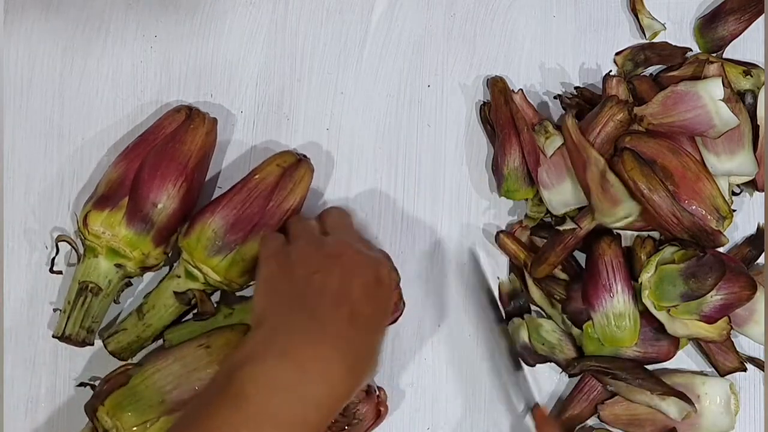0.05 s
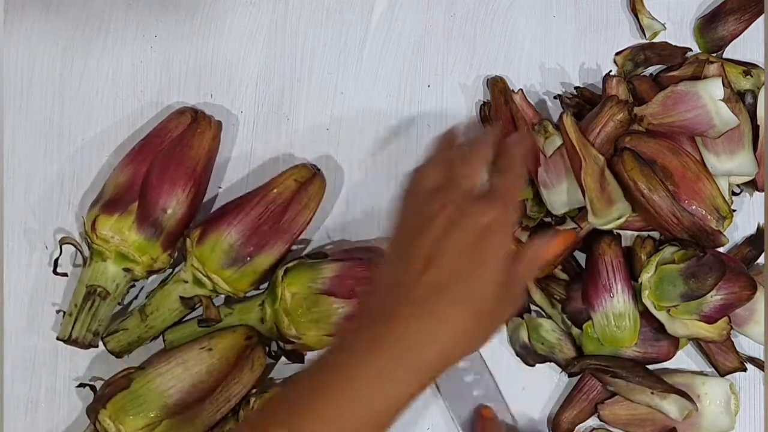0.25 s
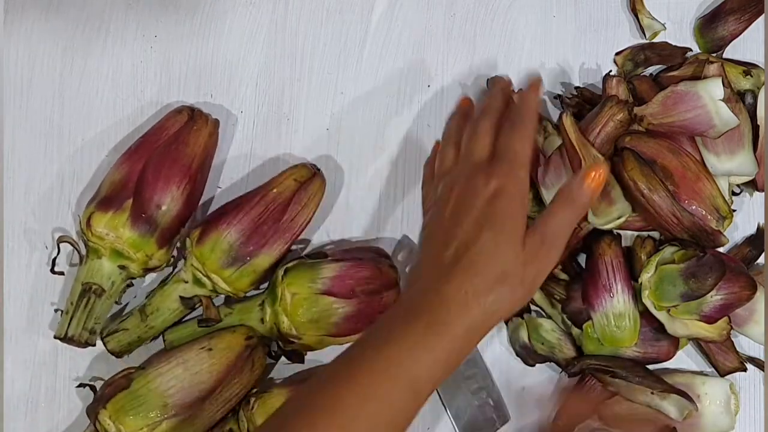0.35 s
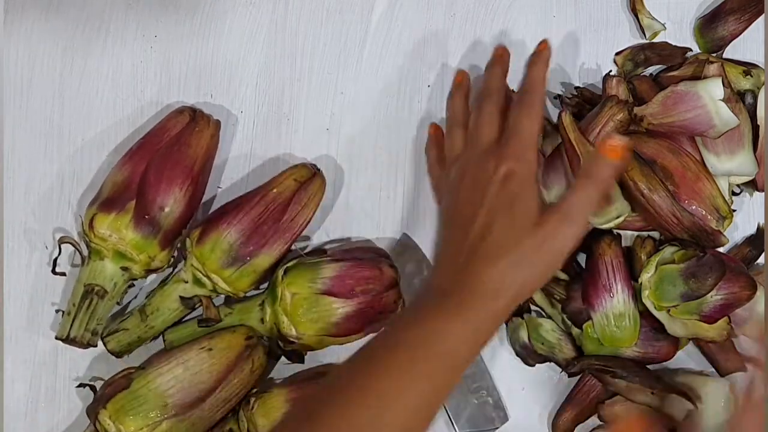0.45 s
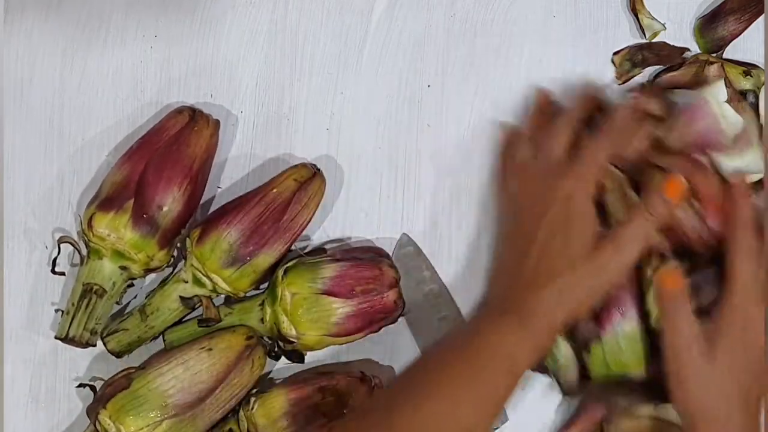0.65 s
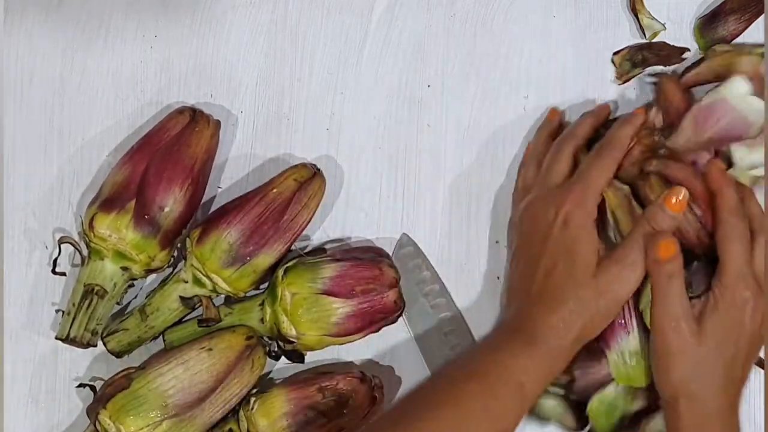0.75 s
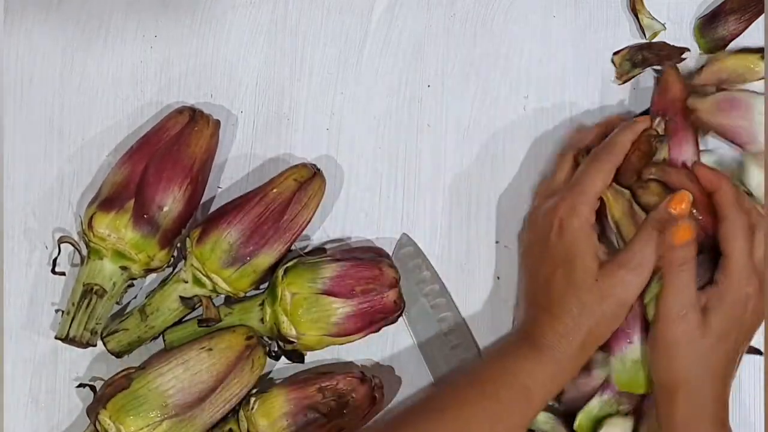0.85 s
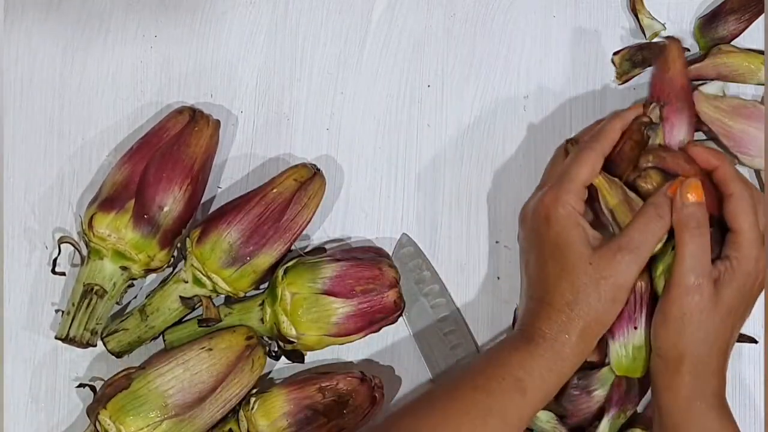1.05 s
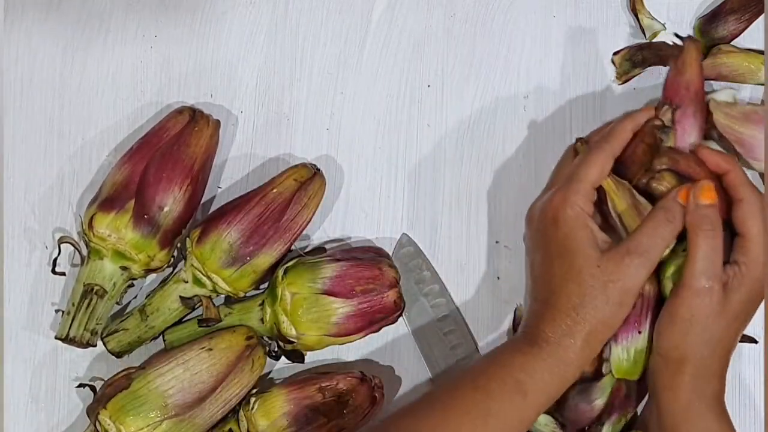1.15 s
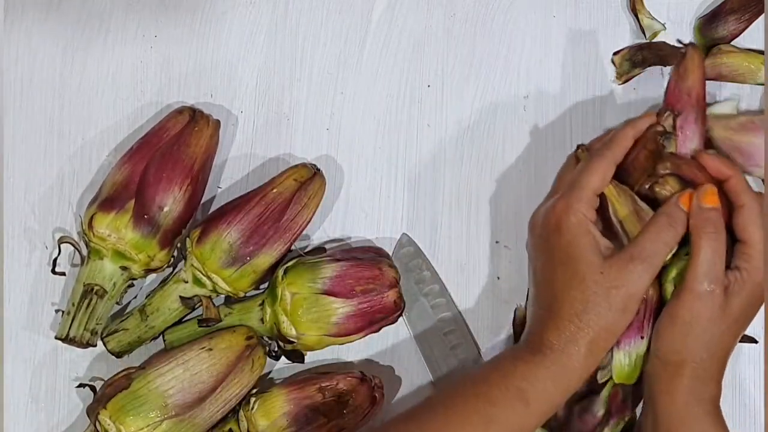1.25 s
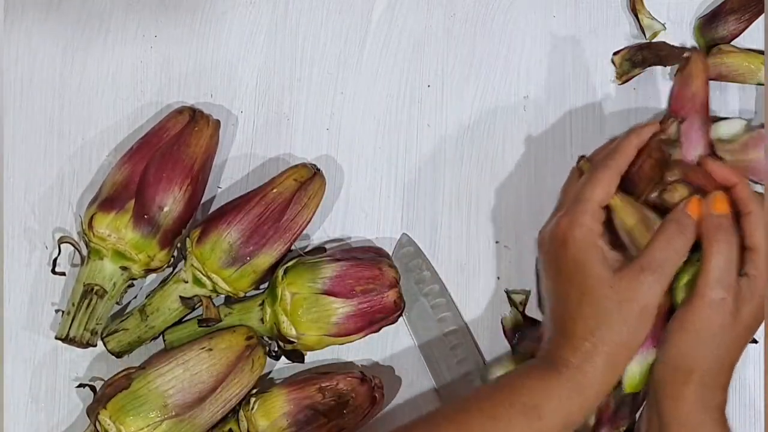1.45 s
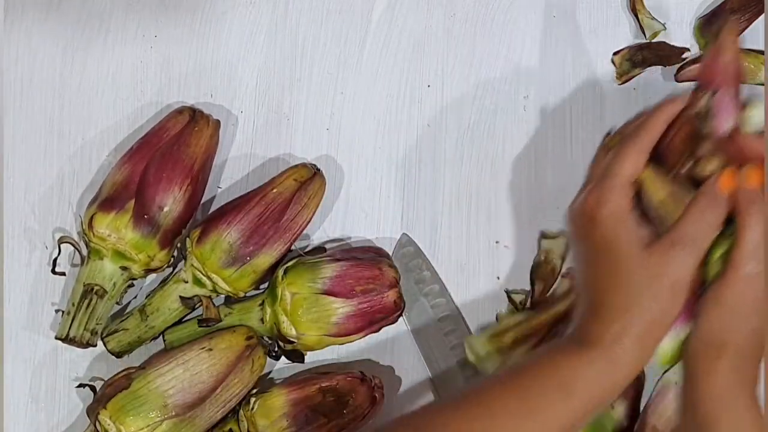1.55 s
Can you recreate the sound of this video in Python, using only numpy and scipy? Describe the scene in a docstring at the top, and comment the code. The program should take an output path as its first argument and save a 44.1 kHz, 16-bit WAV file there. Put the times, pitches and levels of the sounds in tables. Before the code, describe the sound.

A steel knife clatters onto a wooden table, then stiff leaves rustle softly.

```python
"""In a small hard-walled kitchen, an artichoke rolls to rest and a steel knife is put down on a
wooden table. The tip touches and skids, the handle knocks, and the blade clatters flat: each impact
excites the normal modes of steel and wood. Two hands then gather a heap of stiff artichoke leaves,
which rustle, crackle and rub by stick-slip friction and snap as they spring free.
The walls add a short reverberation, and a low rumble lies under it all."""
import sys
import numpy as np
from scipy import signal
from scipy.fft import rfft, irfft
from scipy.io import wavfile
from scipy.ndimage import uniform_filter1d

SR = 44100
rng = np.random.default_rng(int(sys.argv[2]) if len(sys.argv) > 2 else 0)


def generate_wav(sig):
    """Save sig (samples, or channels by samples) to the path in sys.argv[1] as 16-bit PCM at SR."""
    pcm = np.round(np.clip(np.atleast_2d(sig).T, -1, 1) * 32767).astype(np.int16)
    wavfile.write(sys.argv[1], SR, pcm)


N = 70560
T = np.arange(N) / SR

# envelopes of the friction sounds (time [s], level [dB])
ROLL_ENVELOPE = [(0, -43), (.04, -53.5), (.09, -63), (.18, -83)]
RUSTLE_ENVELOPE = [(0, -57), (.12, -91), (.63, -64), (.665, -57.5), (.74, -62.5), (.82, -69.5), (.88, -58),
                   (.95, -71), (1.1, -77.5), (1.24, -81.5), (1.33, -64), (1.4, -77), (1.47, -69.5),
                   (1.53, -64), (1.6, -73.5)]
CRACKLE_ENVELOPE = [(0, -88), (.62, -78.5), (.68, -69), (.74, -66), (.78, -75), (.82, -72), (.9, -73.5),
                    (1.0, -81), (1.15, -83), (1.25, -87), (1.6, -80.5)]
RUB_ENVELOPE = [(.15, -69.5), (.55, -96), (.72, -65.5), (.8, -70), (.9, -67), (1.12, -80), (1.18, -63.5),
                (1.28, -65.5), (1.34, -61), (1.42, -69.5), (1.52, -68.5), (1.6, -69)]
# spectra of the friction sounds (frequency [Hz], relative level [dB])
ROLL_SPECTRUM = [(100, -11.5), (400, -4), (800, -1), (1250, 0), (2000, -5), (3000, -11), (4200, -25.5),
                 (12000, -35.5)]
RUSTLE_SPECTRUM = [(200, -1.5), (700, 1), (1500, 3.5), (3000, 2.5), (5000, -0.5), (8000, -7.5),
                   (12000, -16), (16000, -21)]
CRACKLE_SPECTRUM = [(2000, -31.5), (6000, -4.5), (10000, -2), (13500, -2), (16000, -8.5)]
RUB_SPECTRUM = [(60, -7.5), (220, 2.5), (400, -1.5), (650, 4.5), (950, -2.5), (1400, -14.5), (4000, -29.5)]
# impacts of knife on table (time [s], ring gain [dB], centre of excitation [Hz],
# half-width of excitation [octaves], clack gain [dB], knock gain [dB], thump gain [dB])
IMPACTS = [(0.0, -55, 7900, .08, -67, -44.5, -55.5), (.1995, -45, 5000, 1.3, -29, -31, -48.5),
           (.2212, -38, 5000, 1.3, -30, -30, -51), (.2408, -32, 4640, .5, -28, -32, -59.5),
           (.2675, -39.5, 5870, 0.95, -30, -28.5, -58.5), (.283, -35.5, 9300, .6, -32, -38.5, -60.5),
           (.2925, -29, 7140, 0.49, -29.5, -16.5, -34), (.3162, -20, 6510, 0.48, -24, -20, -38),
           (.3225, -26, 7000, 0.17, -26, -20.5, -48.5), (.3330, -21.5, 6200, 0.53, -28.5, -30, -38.5),
           (.3385, -21.5, 12000, 0.63, -24, -29, -41), (.3425, -19, 8470, 0.25, -32, -30, -38),
           (.349, -26.5, 8910, 0.88, -33, -32.5, -44), (.361, -20, 6100, 0.25, -29.5, -31, -43.5),
           (.3765, -16, 9070, 0.27, -32, -40.5, -41.5), (.399, -36.5, 9100, 0.54, -32, -36.5, -48)]
# blade modes, one list per column (frequency [Hz], relative level [dB], T60 before settling [s])
BLADE_HZ = [3397, 3580, 4115, 4648, 6071, 6095, 6251, 6546, 7213, 7531, 7876, 8624, 8760, 8797, 9474, 10337,
            10658, 11000, 12265, 12480, 12700, 12940, 14180, 14447, 15100]
BLADE_DB = [-7, -16, -7.5, -10, -4.5, -1, -4, -10, -8, -2.5, -6.5, -11.5, -7, -6, -2.5, -6, -5.5, -8, -0.5,
            -7, -5.5, -3, -5.5, -2, -5]
BLADE_T60_S = [.15, .08, .09, .19, .16, 0.11, 0.19, .12, 0.13, .2, .21, 0.1, 0.16, 0.15, .12, .17, 0.25,
               0.11, .15, 0.12, 0.066, 0.12, .11, .15, .11]
# modes of the table top (frequency [Hz], relative level [dB], T60 [s])
TABLE_MODES = [(482, -19.5, .06), (689, -7, 0.035), (906, -2, .04), (993.3, 1, .03), (1367, 0, .04),
               (1620, -3, 0.024), (2120, -9, .015)]
# blade modes driven by the skidding tip (frequency [Hz], relative level [dB])
SKID_MODES = [(3397, -26), (4115, -37), (6095, -40), (8624, -46), (10337, -46)]
# leaves snap and tap (time [s], tone level [dB], frequency [Hz], T60 [s], crack level [dB])
SNAPS = [(.003, -49, 1294, 0.035, -47.5), (.022, -43, 1912, 0.011, -71.5), (.0255, -37, 1236, 0.0084, -60),
         (.04, -44.5, 1206, 0.019, -70), (.565, -50, 1260, 0.012, -68), (.6495, -52, 2710, 0.0074, -43.5),
         (.668, -62, 3500, .008, -54), (.722, -50, 1150, 0.013, -68), (.793, -56, 1248, 0.009, -63),
         (.8455, -39, 1373, 0.0057, -60), (.847, -36, 2530, 0.0023, -38.5),
         (1.056, -58.5, 1156, 0.022, -66), (1.06, -61, 2304, 0.012, -78), (1.154, -56.5, 910, 0.031, -72),
         (1.173, -51.5, 857, 0.024, -70), (1.3045, -64, 2590, .008, -53.5),
         (1.3115, -36.5, 1021, .011, -44.5), (1.433, -55, 1000, .025, -52.5),
         (1.512, -54.5, 510, 0.03, -64), (1.569, -62, 640, 0.016, -58)]
# leaf edges flick past a finger (time [s], level [dB])
FLICKS = [(0.648, -52), (0.776, -52.5), (.849, -55), (1.054, -51.5), (1.144, -58.5), (1.274, -63),
          (1.315, -57.5), (1.566, -66.5)]
# bright clack with a notched, uneven treble (frequency [Hz], relative level [dB])
NOTCHED_CLACK = [(300, -23.5), (1200, 5), (2500, 3), (4200, 2.5), (5200, 0), (6200, -7.5), (6900, -7.5),
                 (7700, -2), (9300, -10), (9900, -15), (10600, -9), (11600, -13.5), (12600, -3),
                 (13600, -15.5), (14400, -7), (16000, -22.5)]
# spectra of the low thump, the crack and the flick (frequency [Hz], relative level [dB])
THUMP_SPECTRUM = [(25, -24), (55, -1.5), (80, -1), (120, 8.5), (165, -14), (225, 4), (320, -1.5),
                  (450, -1.5), (800, -10), (2000, -40.5)]
CRACK_SPECTRUM = [(400, -4.5), (1500, 11.5), (3000, 4.5), (6500, 0), (10000, -5), (16000, -9.5)]
FLICK_SPECTRUM = [(1000, -22), (2500, 0), (6000, -0.5), (10000, -0.5), (16000, -8)]
# spectra of the background rumble and the reverberation (frequency [Hz], relative level [dB])
RUMBLE_SPECTRUM = [(20, -34.5), (38, -11.5), (58, 1.5), (90, 2), (170, -14), (300, -5), (700, -21.5),
                   (1600, -28), (6000, -33), (12000, -40), (16000, -50)]
ROOM_SPECTRUM = [(100, -13), (500, -4), (1500, 0.5), (5000, 0.5), (15000, 0)]
# reverberation time of the kitchen (frequency [Hz], T60 [s])
ROOM_T60 = [(100, .4), (400, .48), (1000, 0.39), (2800, 0.38), (7000, 0.31), (15000, 0.24)]


def amp(db):
    """Amplitude ratio of a level in decibels."""
    return 10 ** (np.asarray(db) / 20)


def unit(x):
    """Normalisation to rms 1."""
    return x / np.sqrt(np.mean(x ** 2) + 1e-20)


def read(points, hz):
    """Interpolation on a log-frequency axis."""
    f, value = np.transpose(points)
    return np.interp(np.log(hz + 1), np.log(f + 1), value)


def colour(x, spectrum):
    """Spectral shaping, at rms 1."""
    size = x.shape[-1]
    gain = amp(read(spectrum, np.fft.rfftfreq(size, 1 / SR)))
    return unit(irfft(rfft(x) * gain, size))


def stereo_noise(width, size):
    """Partial coherence: two noises with a shared middle and an opposed side."""
    mid, side = rng.standard_normal((2, size))
    return unit(np.array([mid + width * side, mid - width * side]))


def decay(t, t60):
    """Exponential damping by 60 dB in t60 seconds."""
    return np.exp(-np.log(1000) * t / np.maximum(t60, 1e-3))


def add(mix, onset_s, sound):
    """Superposition of a sound on the mix."""
    part = mix[:, max(round(onset_s * SR), 0):][:, :sound.shape[-1]]
    part += sound[..., :part.shape[1]]


def burst(spectrum, t60, rise_s):
    """Damped transient: shaped noise that rises quickly and decays exponentially."""
    t = T[:SR // 4]
    noise = colour(stereo_noise(width=.69, size=len(t)), spectrum)
    return noise * decay(t, t60) * (1 - np.exp(-t / rise_s))


def friction(envelope, spectrum, slips_per_s=2500, spread_db=3.5):
    """Stick-slip friction: tiny random impulses of uneven size, scattered from left to right."""
    size = amp(spread_db * np.minimum(rng.exponential(1, N), 4)) * rng.choice([-1, 1], N)
    slips = size * (rng.random(N) < slips_per_s / SR)
    pan = rng.uniform(.05, 1, N)
    level_db = np.interp(T, *np.transpose(envelope))
    return colour(slips * np.array([pan, 1 - pan]), spectrum) * amp(level_db)


def artichoke_roll():
    """Rolling noise: small contacts die away as the artichoke comes to rest."""
    return friction(ROLL_ENVELOPE, ROLL_SPECTRUM)


def leaf_rustle():
    """Sliding friction: leaf rustles over leaf, and the dry tips crackle in the treble."""
    return friction(RUSTLE_ENVELOPE, RUSTLE_SPECTRUM) + friction(CRACKLE_ENVELOPE, CRACKLE_SPECTRUM)


def blade_ring(chatter_depth=.35, chatter_hz=60.03, settle_s=.34, stereo_phase_rad=1.8):
    """Free vibration: each impact excites the blade's modes, weighted by the spot that is struck."""
    onset_s, ring_db, centre_hz, octaves = np.transpose(IMPACTS)[:4]
    onsets = np.round(onset_s * SR).astype(int)
    out, knots = np.zeros((2, N)), np.arange(2000)
    for hz, db, t60 in zip(BLADE_HZ, BLADE_DB, BLADE_T60_S):
        scatter_db = .5 * rng.standard_normal(len(onsets))
        weight = amp(db + ring_db + scatter_db) / (1 + (np.log2(hz / centre_hz) / octaves) ** 2)
        kicks = np.zeros(N, complex)
        kicks[onsets] = weight * np.exp(2j * np.pi * rng.random(len(onsets)))
        envelope = signal.lfilter([1], [1, -decay(1 / SR, t60)], kicks)
        ring = envelope * np.exp(2j * np.pi * hz * T)
        phasors = np.exp(.5j * stereo_phase_rad * rng.choice([-1, 1]) * np.array([1, -1]))
        for channel, phasor in zip(out, phasors):
            # the loose blade buzzes on the wood, so each mode flutters
            real, imag = rng.standard_normal((2, len(knots)))
            flutter = np.interp(T * 2 * chatter_hz, knots, real + 1j * imag)
            channel += (ring * (phasor + chatter_depth * flutter)).imag
    return out * decay(np.maximum(T - settle_s, 0), t60=.38)  # lying flat, it is damped by the wood


def table_knock(rise_s=.00056, detune=.02):
    """Impulse response of a plate: the heavily damped modes of the wooden top give a short knock."""
    hz, db, t60 = np.transpose(TABLE_MODES)[:, :, None]
    t = T[:SR // 8]
    hz = hz * (1 + detune * rng.standard_normal(hz.shape))
    phase = rng.uniform(0, np.pi, hz.shape)
    modes = amp(db) * decay(t, t60) * np.sin(2 * np.pi * hz * t + phase)
    return .5 * (1 - np.exp(-t / rise_s)) * modes.sum(0)


def knife_impacts():
    """Impact excitation: each contact clacks, knocks the top and shakes the table with a thump."""
    out = np.zeros((2, N))
    for onset_s, _, _, _, clack_db, knock_db, thump_db in IMPACTS:
        add(out, onset_s, amp(clack_db) * burst(NOTCHED_CLACK, t60=.045, rise_s=.00064))
        add(out, onset_s, amp(knock_db) * table_knock())
        add(out, onset_s, amp(thump_db) * burst(THUMP_SPECTRUM, t60=.22, rise_s=.013))
    return out


def leaf_snaps(rise_s=.0013):
    """Elastic release: a stiff leaf springs free with a crack, and its hollow resonates briefly."""
    out, t = np.zeros((2, N)), T[:SR // 10]
    for onset_s, db, hz, t60, crack_db in SNAPS:
        envelope = (1 - np.exp(-(t / rise_s) ** 2)) * decay(t, t60)
        add(out, onset_s, amp(db) * envelope / envelope.max() * np.sin(2 * np.pi * hz * t))
        add(out, onset_s, amp(crack_db) * burst(CRACK_SPECTRUM, t60=.018, rise_s=.0009))
    return out


def heap_rub():
    """Sliding friction: the heap moves along the table with a low scrape."""
    return friction(RUB_ENVELOPE, RUB_SPECTRUM)


def tip_skid(onset_s=.203, length_s=.038, release_s=.005, roughness=.055, gain_db=-1.5):
    """Stick-slip excitation: the sliding tip drives a few blade modes, the lowest most strongly."""
    t = T - onset_s
    hz, db = np.transpose(SKID_MODES)[:, :, None]
    swell = np.clip(t / length_s, 0, 1) ** .7
    release = np.exp(-np.maximum(t - length_s, 0) / release_s)
    grip = 1 + roughness * unit(uniform_filter1d(rng.standard_normal(N), size=40))
    modes = amp(gain_db + db) * np.sin(2 * np.pi * hz * t)
    return swell * release * grip * modes.sum(0)


def leaf_flicks():
    """Plucking: a thin leaf edge slips past a finger and radiates a bright transient."""
    out = np.zeros((2, N))
    for onset_s, db in FLICKS:
        add(out, onset_s, amp(db) * burst(FLICK_SPECTRUM, t60=.036, rise_s=.0042))
    return out


def reverberation(x, delay_s=.0035, mono_below_hz=450):
    """Diffuse field: dense reflections from hard walls; treble dies first and bass is near mono."""
    hz, t, (mid, side) = signal.stft(rng.standard_normal((2, SR * 3 // 4)), SR, nperseg=256)
    hz = hz[:, None]
    side = side * hz / np.hypot(hz, mono_below_hz)
    field = np.array([mid + side, mid - side]) * amp(read(ROOM_SPECTRUM, hz))
    tail = signal.istft(field * decay(t, read(ROOM_T60, hz)), SR, nperseg=256)[1]
    tail *= np.clip(T[:tail.shape[1]] / delay_s - 1, 0, 1)  # reflections build up after the delay
    return signal.fftconvolve(x, tail / np.linalg.norm(tail[0]), axes=1)[:, :N]


def scene(knife_room_db=1, leaf_room_db=-1, rumble_db=-67.5):
    """Superposition of direct sound, reverberation and background rumble."""
    knife = blade_ring() + tip_skid() + knife_impacts()
    knife += amp(knife_room_db) * reverberation(knife)
    knife *= amp([[.85], [-.85]])  # slightly to the left
    leaves = leaf_snaps() + leaf_flicks() + leaf_rustle() + heap_rub() + artichoke_roll()
    rumble = amp(rumble_db) * colour(stereo_noise(width=.51, size=N), RUMBLE_SPECTRUM)
    return knife + leaves + amp(leaf_room_db) * reverberation(leaves) + rumble


def record(dry):
    """Band limiting: a linear-phase low-pass filter removes the highest treble."""
    lowpass = signal.firwin(511, cutoff=16100, window=("kaiser", 9), fs=SR)
    return signal.oaconvolve(dry, lowpass[None], "same")


dry = scene()
out = record(dry)
generate_wav(out)
```